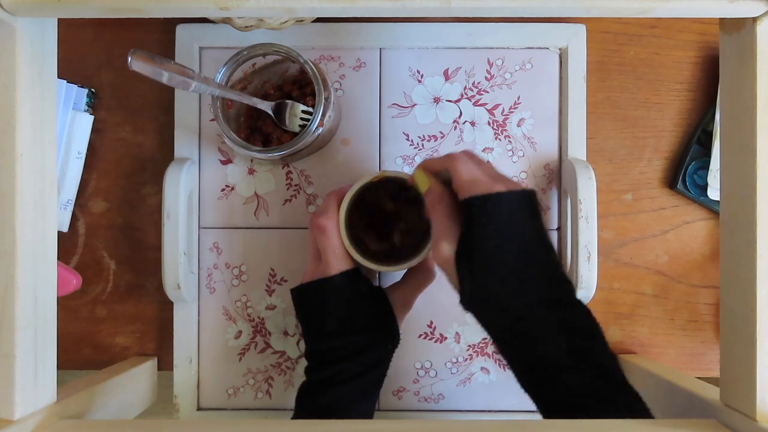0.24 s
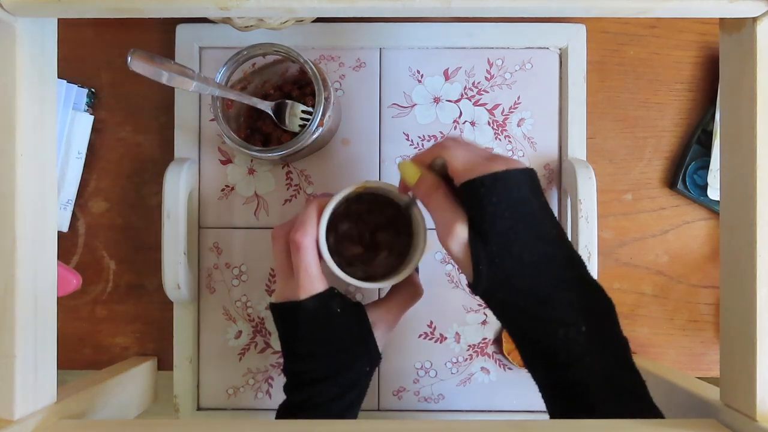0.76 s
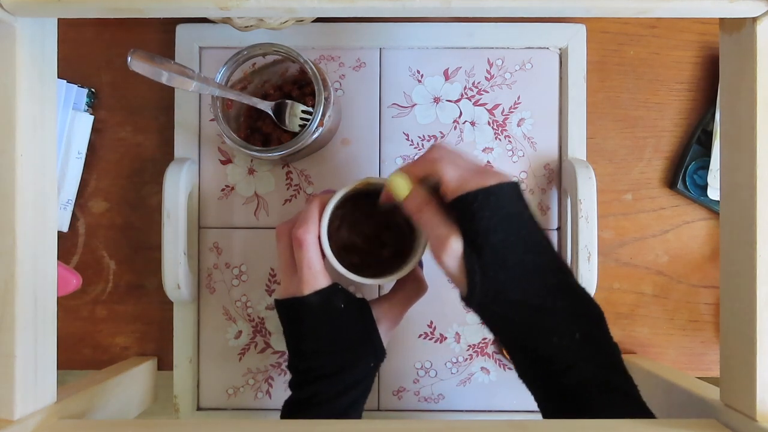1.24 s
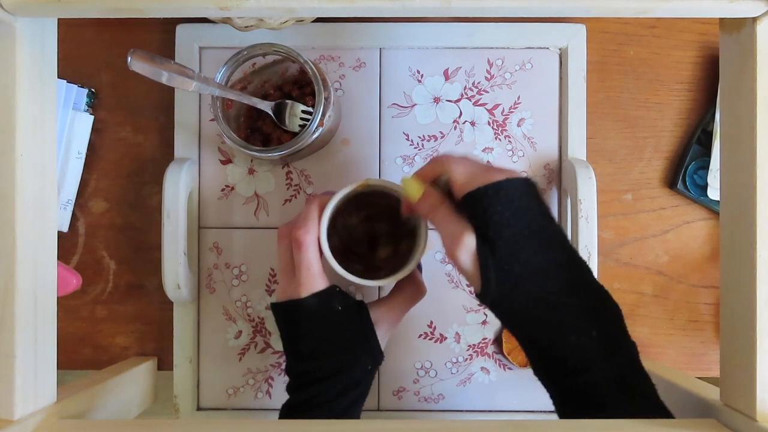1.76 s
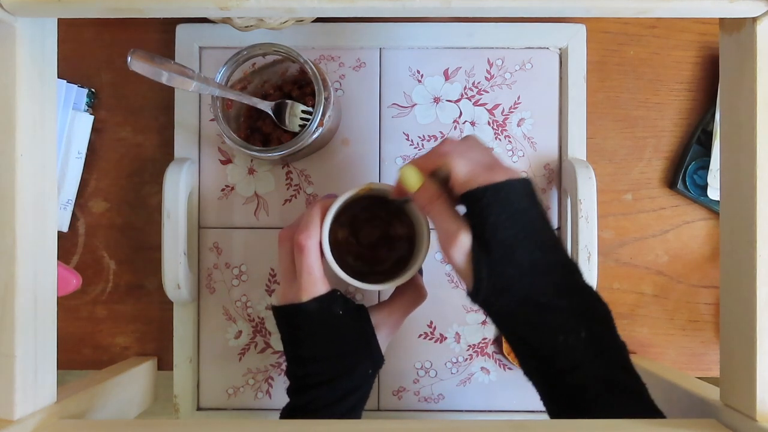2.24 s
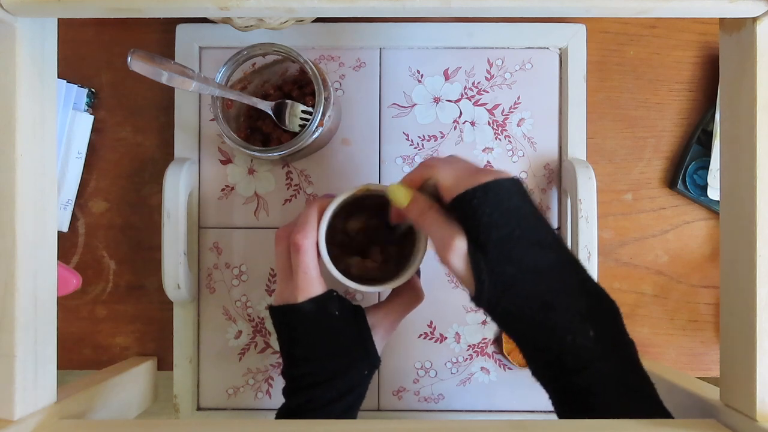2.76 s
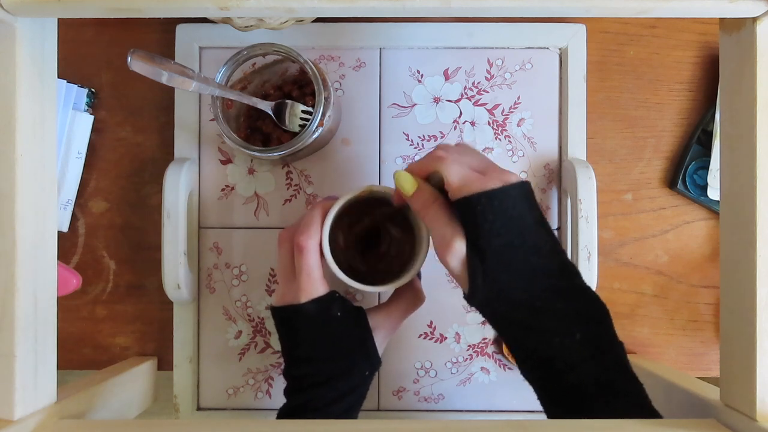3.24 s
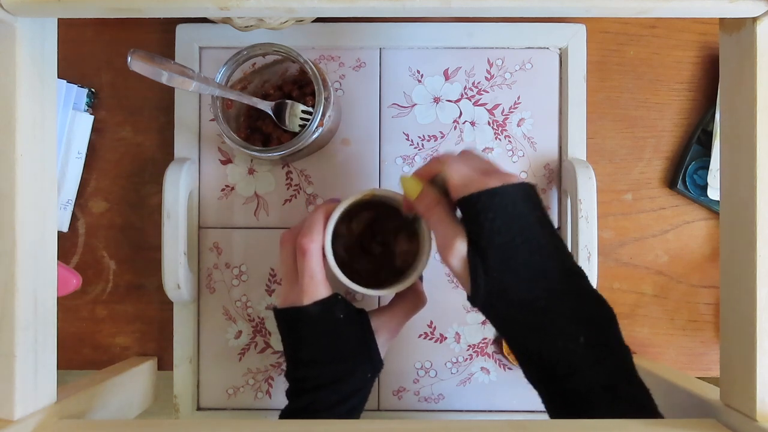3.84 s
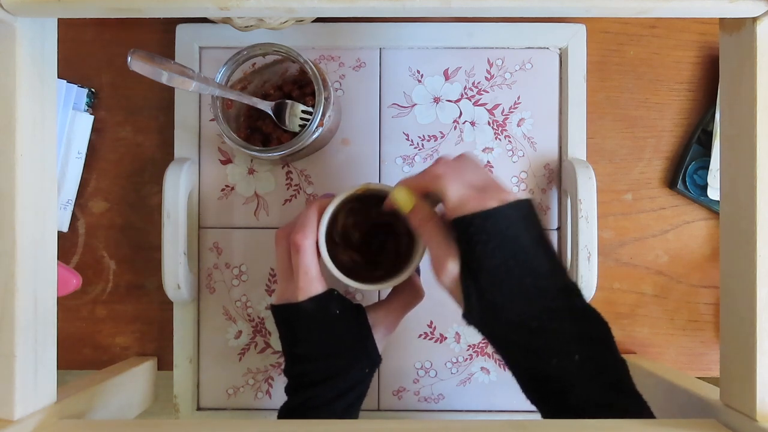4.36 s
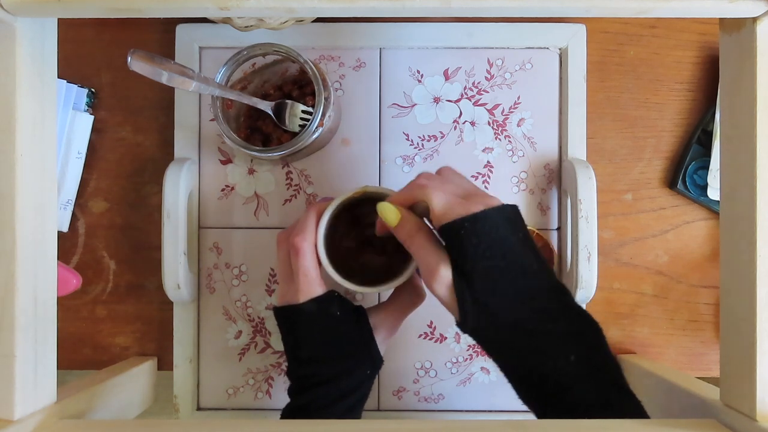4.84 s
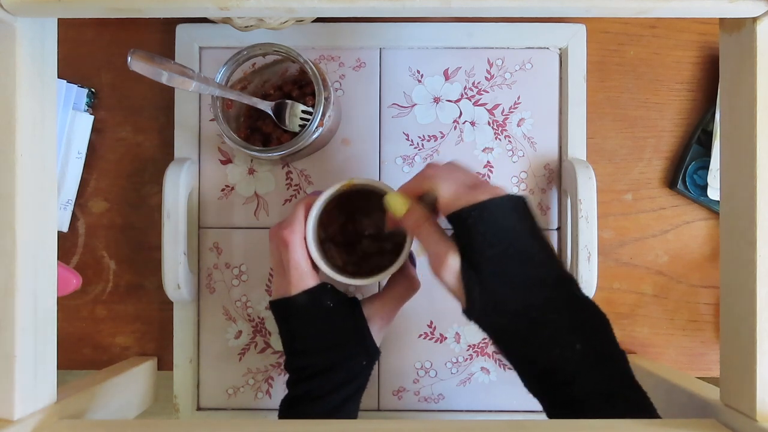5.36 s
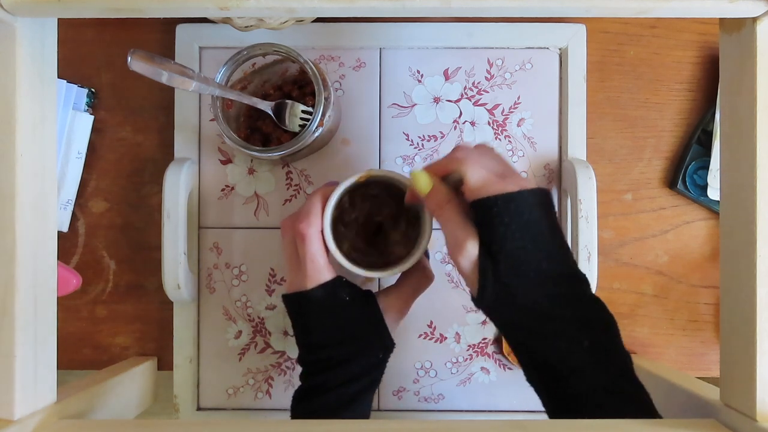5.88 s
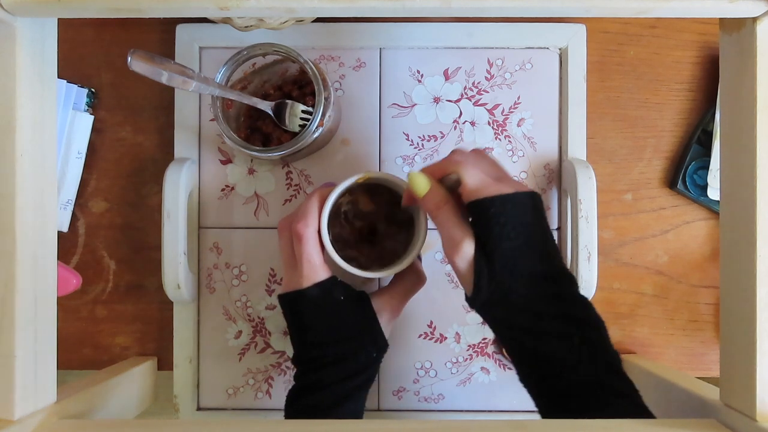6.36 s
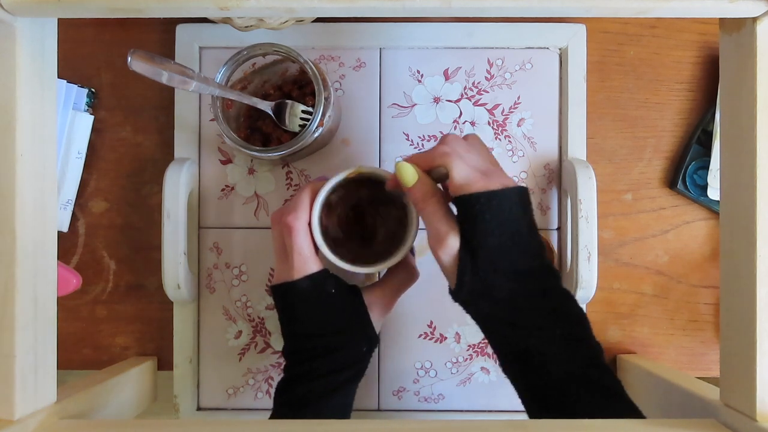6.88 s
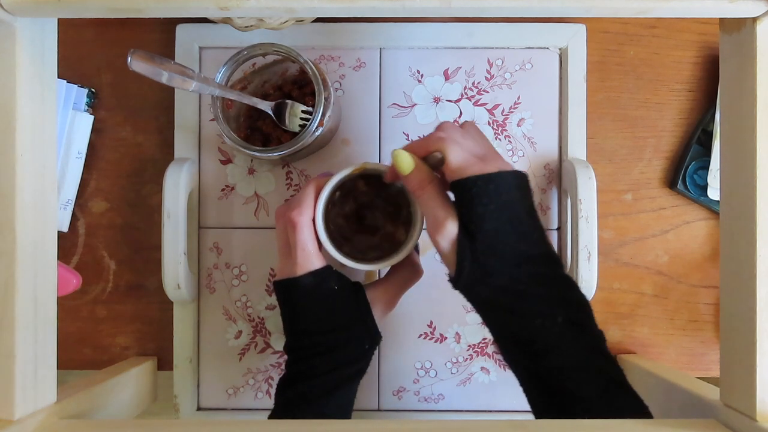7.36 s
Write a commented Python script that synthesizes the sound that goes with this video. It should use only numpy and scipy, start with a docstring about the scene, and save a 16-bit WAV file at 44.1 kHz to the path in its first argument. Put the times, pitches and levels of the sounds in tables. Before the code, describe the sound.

In a small, hard-walled kitchen, a metal spoon stirs a thick drink inside a hand-held ceramic cup, heard very close. From 0 to 0.7 s the cup base drags in short jerks over a resonant wooden tray, with a firm knock and clink at 0.33 s and a lighter knock at 0.5 s; then it is lifted. Stirring continues unevenly, with several short clinks per second, damped by hand and liquid, between soft taps and sharper hits around 1.9, 2.5, 3.0 and 4.0 s. A bright ping and light tray knock come near 3.35 s. Wet, patchy swishing is strongest around 4 to 5 s, with little rising plops throughout. A low tray thud falls at 6.15 s, a prominent hollow plop at 6.73 s, and clinks continue to the end at about 7.6 s. Short reflections, faint hiss and low refrigerator hum remain underneath.

```python
"""Spoon stirring a thick drink in a ceramic cup

A metal spoon stirs a hand-held cup above a wooden tray in a small hard-walled kitchen.
Clinks: damped wall modes plus noisy contact; pings and plops: short decaying sines; swish: patchy noise.
The cup drags and knocks on resonant tray modes. A two-sine refrigerator hum lies under a faint noise hiss.
"""
import sys
import numpy as np
from scipy import signal
from scipy.io import wavfile

SR = 44100
rng = np.random.default_rng(int(sys.argv[2]) if len(sys.argv) > 2 else 0)


def bounce(signal):
    """Save signal as a 16-bit WAV file at the path given by the first command-line argument."""
    frames = np.transpose(np.atleast_2d(signal))
    limited = np.clip(frames, -1, 1)
    pcm = np.round(limited * 32767).astype(np.int16)
    wavfile.write(sys.argv[1], SR, pcm)


N = 336042

# half-octave noise band edges, f/Hz
EDGES_HZ = 22 * 2 ** np.arange(0, 9.9, .5)

# refrigerator hum, turning rate and its double: level/dB
HUM_DB = [-44.5, -46]
# room hiss spectrum: f/Hz, density/dB per Hz
HISS_SPECTRUM = [(26, -25), (62, -20), (110, 3), (137, 2), (170, -4), (400, -6), (690, -15.5), (1000, -0.5),
                 (1800, -45), (2600, -61), (4750, -23.5), (7000, -35.5), (11000, -33.5), (15500, -57)]
# noise and echo width: f/Hz, side re mid/dB
SIDE_LEVEL = [(60, -32), (260, 0.5), (1400, -15.5), (3000, -16.5), (6000, -6), (10000, -0.5), (14000, 5)]
# kitchen reverberation: f/Hz, t60/s
KITCHEN = [(200, 0.25), (800, 0.25), (2000, 0.3), (5500, 0.29), (14000, 0.18)]
# spoon through the drink, brushing the wall: t/s, level/dB
SWISH = [(0, -54.5), (.6, -52), (.9, -48), (1.3, -49.5), (1.6, -49), (2.2, -51.5), (3.1, -48.5), (3.7, -50),
         (4.2, -47.5), (5, -46.5), (5.6, -51), (5.85, -50.5), (6.4, -48.5), (7.1, -49.5), (7.62, -52.5)]
# swish spectrum: f/Hz, density/dB per Hz
SWISH_SPECTRUM = [(290, -31), (500, 3.5), (911, -3.5), (1500, 5), (2630, -4.5), (2860, -16), (3190, -3),
                  (3420, -1.5), (14000, -33)]
# jerks of the cup base sliding on the tray: t/s, peak level/dB
SCUFFS = [(0.021, -32), (.19, -29.5), (.4, -31), (.6, -30.5), (0.664, -23)]
# cup or wrist on the tray: t/s, level/dB, tilt/dB per octave about 400 Hz
KNOCKS = [(0.329, -15, -2.5), (0.526, -25.5, -1), (3.383, -24.5, -0.5), (5.98, -43, 10), (6.014, -35.5, 13),
          (6.156, -12.5, -6), (6.255, -27.5, 6.5)]
# tray modes: f/Hz, level/dB, t60 when knocked/s
TRAY_MODES = [(156, -7, 0.018), (222.5, -18.5, 0.166), (237, -20.5, 0.11), (332, -5.5, 0.058),
              (384, -9.5, 0.063), (530, -4.5, 0.031), (709, -8, 0.07), (863, -5, 0.078), (1220, -11, 0.018),
              (1380, -9, 0.02)]
# air trapped behind the spoon plops: t/s, starting pitch f/Hz, level/dB
PLOPS = [(0.1395, 1105, -28.5), (0.3294, 1090, -19), (0.5234, 1150, -29), (0.8896, 1410, -32),
         (0.935, 1397, -15), (1.0494, 1725, -15.5), (1.0972, 1800, -35), (1.51, 1740, -44),
         (1.6044, 1695, -16.5), (1.722, 1736, -20.5), (1.9173, 1750, -41), (2.3339, 1420, -45),
         (2.7512, 1450, -31), (3.127, 1490, -25.5), (3.19, 1754, -19), (3.3444, 1700, -19),
         (3.388, 1250, -24.5), (3.54, 1500, -30), (3.5672, 1760, -15.5), (4.2054, 1063, -21),
         (4.4338, 1690, -29), (4.864, 1430, -27), (5.091, 1410, -26), (5.7939, 1890, -48),
         (5.851, 1410, -27.5), (6.0127, 1727, -25), (6.248, 1420, -27), (6.5033, 1700, -30.5),
         (6.5776, 1420, -18), (6.7309, 1738, -7.5), (6.7513, 1770, -11), (6.964, 1060, -31),
         (6.9885, 1700, -29), (7.0601, 1410, -22), (7.23, 1444, -20.5), (7.4776, 1286, -30.5)]
# spoon on cup: t/s, blow level/dB; re the blow: wall ring/dB, upper ring/dB, crack/dB
STRIKES = [(0.1402, -31.5, 1.5, -2.5, -28), (0.3294, -9, -5.5, -8.5, -23), (0.5249, -38.5, 2, -1.5, -24),
           (0.6444, -44, -10, -9, -25), (0.677, -33, -11, -15, -22), (0.8244, -21.5, -8.5, -3, -15.5),
           (0.8874, -20.5, -4.5, 5, -16.5), (0.936, -23, -20, -24, -23), (1.0987, -13, -9.5, -0.5, -23.5),
           (1.2341, -29.5, -7, 0, -11.5), (1.4466, -24.5, -10.5, -7, -10.5), (1.51, -22, 3.5, -8, -15),
           (1.6046, -23.5, -22, -27, -30), (1.723, -23.5, -5, -4.5, -23), (1.9164, -12, -4.5, 4, -16),
           (2.027, -30, -0.5, -18, -14), (2.1242, -14.5, -5.5, 2.5, -14.5), (2.268, -27.5, -7, -3, -10.5),
           (2.3346, -15, -6.5, 1, -18), (2.5285, -12, -6.5, 3.5, -12), (2.7508, -18.5, -11, -2, -21.5),
           (2.881, -34.5, 5.5, 3, -4), (2.9554, -10.5, -14, -0.5, -19.5), (3.0926, -31, -18, -2.5, -12),
           (3.1256, -41, 3, -18, -25), (3.19, -41, -3, -24, -17), (3.2234, -44, -25, -23, -10),
           (3.3432, -12.5, -4.5, -1, -15), (3.5417, -29.5, -12, -9, -19), (3.5677, -16.5, -10.5, -3, -23),
           (3.8716, -40.5, -4, -18, -23), (4.009, -11, -8.5, -4, -18), (4.2045, -19.5, 6, 2.5, -13.5),
           (4.4355, -22.5, 5, 3, -12), (4.6574, -29, -5.5, -4, -28), (4.7844, -21, -9, -15, -13),
           (4.8647, -19.5, 2.5, 3, -15), (5.0906, -16, -8, -2.5, -22), (5.232, -24.5, -12, -8, -23),
           (5.3208, -19, -9.5, -11, -22), (5.455, -26, -8.5, -3.5, -12.5), (5.74, -43, -18, -30, -42),
           (5.7932, -18, -11.5, -8.5, -31), (5.8467, -31.5, -13, -3, -46), (6.014, -12, -7, 0.5, -15.5),
           (6.249, -18, -8.5, 1.5, -20), (6.5057, -34.5, -12, -2, -41), (6.577, -21.5, -14, -29, -46),
           (6.7291, -13.5, -26, 1.5, -18), (6.7498, -24, 1, -3, -38), (6.9881, -27, -7, -4, -34),
           (7.0623, -26, -12, -34, -21), (7.23, -14, -13, -2, -18), (7.4775, -20.5, -16.5, -6.5, -33)]
# cup wall modes, damped by hand and drink: f/Hz, level/dB, t60 when struck/s
# the first two follow the wall ring, the rest the upper ring
CUP_MODES = [(1868.6, 6, 0.041), (1899.5, 7.5, 0.055), (4473, 1, 0.0074), (4543, -11, 0.007),
             (4671, -5.5, 0.032), (4783, -0.5, 0.016), (5100, -8, 0.0074), (5790, -30.5, 0.017),
             (9436, -25, 0.015)]
# noisy contact spectrum: f/Hz, density/dB per Hz
IMPACT_SPECTRUM = [(330, 16.5), (760, 29.5), (1450, 26.5), (2550, 8.5), (4000, 16), (5500, 18.5),
                   (7300, 18), (10600, 11), (15000, -5)]
# how far the contact follows the dull knock: f/Hz, share/0-1
KNOCK_SHARE = [(900, 1), (2600, 0)]
# how far the contact follows the crack: f/Hz, share/0-1
CRACK_SHARE = [(3800, 0), (7500, 1)]
# short notes of the spoon bowl after some blows: t/s, f/Hz, level/dB
PINGS = [(.3289, 3800, -19.5), (.8238, 3650, -20), (.936, 2800, -24), (1.0972, 3700, -20),
         (1.4461, 3450, -24.5), (1.722, 3800, -30), (2.1245, 2120, -14), (2.268, 3400, -26.5),
         (2.268, 5570, -24), (2.5276, 3300, -17.5), (2.8814, 3430, -29), (2.9553, 3840, -22),
         (3.0921, 3500, -28), (3.2234, 5780, -32.5), (3.3432, 3920, -9), (3.3432, 5190, -11),
         (3.5669, 3900, -24.5), (4.009, 2180, -26), (4.2034, 3930, -24), (4.4338, 2100, -30),
         (4.7864, 3210, -19.5), (4.8644, 4070, -30), (5.0903, 4370, -25), (5.3209, 3180, -30),
         (5.463, 3060, -20.5), (5.7934, 2300, -24), (5.8487, 3100, -27), (6.248, 4370, -31),
         (6.405, 5500, -39.5), (7.15, 5570, -41.5), (6.5762, 3060, -21.5), (6.5762, 5600, -34),
         (6.7299, 4220, -15.5), (6.9878, 2280, -30), (7.0621, 2960, -21.5), (7.231, 4000, -18)]

HUM_HZ, HISS_DB = 49.33, -52
SINGING_DB = -8  # cup wall re swish noise
WAKE_DB, WAKE_PEAK_S = -33.5, 0.033  # slosh re the blow, time to its peak
SCUFF_RISE_DB_PER_S, SCUFF_FALL_DB_PER_S, SLIDE_DB, LIFTED_S = 600, 182, -42.5, .688
TRAY_ROOM_DB, TRAY_SIDE_DB = -0.5, -13
KITCHEN_DB, FIRST_ECHO_S = 4.5, 0.00049
HIT_SAMPLES = 2600
BUBBLE_T60_S, BUBBLE_RISE, SPOON_T60_S = 0.026, 0.035, 0.013
CONTACT_S, CRACK_RISE_S = 0.00033, 0.0017  # the drink cushions the blow
IMPACT_T60_S, CLICK_DB, CHATTER_DB = 0.0063, 3, 2
KNOCK_DB, KNOCK_FOLLOWS = -17, 0.35  # dull knock re the blow, dB per dB of wall ring
CUTOFF_HZ = 16500


def from_db(db):
    """Decibels to gain."""
    return 10 ** (np.asarray(db) / 20)


def rms_one(x):
    """Scaled to rms 1."""
    return x / np.sqrt(np.mean(x ** 2) + 1e-20)


def in_time(rows):
    """Gain of a (t/s, level/dB) curve at every sample, -120 dB past its end."""
    t_s, level_db = np.transpose(rows)
    return from_db(np.interp(np.arange(N) / SR, t_s, level_db, right=-120))


def at_hz(points, hz):
    """Frequency table read on a log-frequency axis."""
    table_hz, value = np.transpose(points)
    return np.interp(np.log(hz), np.log(table_hz), value)


def swelling(t_s, rise_s):
    """Soft onset of a cushioned contact."""
    return 1 - np.exp(-t_s / rise_s)


def bands(shape, first=0, envelope=1, click=0):
    """Centre/Hz and white noise of each half-octave band, led by a click; neighbours are unrelated."""
    white = rng.standard_normal((2, *shape)) * envelope
    white[0, ..., 0], white[1, ..., 0] = click, -click
    for k in range(first, len(EDGES_HZ) - 1):
        low_hz, high_hz = EDGES_HZ[k:k + 2]
        sos = signal.butter(2, [low_hz, high_hz], "band", fs=SR, output="sos")
        yield np.sqrt(low_hz * high_hz), signal.sosfilt(sos, white[k % 2])


def mid_side(spectrum, first=0, patchy_db=0):
    """Coloured noise, mid rms 1; patchy_db lets each band's level wander on its own about every 50 ms."""
    steps = np.arange(N) / (SR // 20)
    count = N // 2000 + 2
    out = 0
    for hz, band in bands((2, N), first):
        patches_db = patchy_db * np.interp(steps, np.arange(count), rng.standard_normal(count))
        width_db = np.array([[0], [at_hz(SIDE_LEVEL, hz)]])
        out = out + from_db(at_hz(spectrum, hz) + patches_db + width_db) * band
    return out / np.sqrt(np.mean(out[0] ** 2))


def resonate(x, hz, t60_s):
    """Two-pole resonator: a unit click sets a sine of initial height 1 ringing."""
    radius, w = from_db(-60 / (t60_s * SR)), 2 * np.pi * hz / SR
    return signal.lfilter([0, np.sin(w)], [1, -2 * radius * np.cos(w), radius * radius], x + 1e-18)


def struck(modes, levels_db, spread_db, detune):
    """Decaying sines, one row per blow (levels_db: blows x modes); grip and drink shift each mode."""
    t_s = np.arange(HIT_SAMPLES) / SR
    hz, mode_db, t60_s = np.transpose(modes)
    chance = rng.standard_normal((*levels_db.shape, 2))
    signs = (-1) ** np.arange(len(hz))
    gains = from_db(levels_db + mode_db + spread_db * chance[..., 0]) * signs
    pitch_hz = hz * (1 + detune * chance[..., 1])
    decays = from_db(-60 * t_s / t60_s[:, None])
    sines = np.sin(2 * np.pi * pitch_hz[..., None] * t_s)
    return np.einsum("bm,mt,bmt->bt", gains, decays, sines)


def echo_tails():
    """Six diffuse mid/side tails, each band dying at its own rate; mean mid energy 1."""
    t_s = np.arange(15000) / SR
    tails = 0
    for hz, band in bands((6, 2, len(t_s)), first=4):
        width_db = np.array([[0], [at_hz(SIDE_LEVEL, hz)]])
        tails = tails + from_db(-60 * t_s / at_hz(KITCHEN, hz) + width_db) * band
    tails *= np.clip(t_s / FIRST_ECHO_S, 0, 1) ** 2
    return tails / np.sqrt(np.mean(np.sum(tails[:, 0] ** 2, axis=1)))


def in_kitchen(times_s, hits, wet_db):
    """Each hit direct in mid plus one of the tails in turn, as the cup keeps moving."""
    responses = from_db(wet_db) * echo_tails()
    responses[:, 0, 0] = 1  # direct sound
    choice = np.arange(len(hits)) % len(responses)
    heard = signal.fftconvolve(hits[:, None], responses[choice], axes=2)
    out = np.zeros((2, N + SR))
    for t_s, sound in zip(times_s, heard):
        start = round(t_s * SR)
        out[:, start:start + sound.shape[1]] += sound
    return out[:, :N]


def notes(rows, t60_s, rise):
    """Short decaying sines; pitch climbs by a fraction 2 * rise per t60."""
    start_s, hz, level_db = np.transpose(rows)[:, :, None]
    t_s = np.arange(HIT_SAMPLES) / SR
    sines = np.sin(2 * np.pi * hz * t_s * (1 + rise * t_s / t60_s))
    tones = from_db(level_db - 60 * t_s / t60_s) * sines
    return in_kitchen(start_s[:, 0], swelling(t_s, CONTACT_S) * tones, KITCHEN_DB)


def refrigerator():
    """Compressor motor's turning rate and its double, mid only."""
    turn = 2 * np.pi * HUM_HZ * np.arange(N) / SR
    hum = sum(np.sqrt(2) * from_db(db) * np.cos(k * turn) for k, db in enumerate(HUM_DB, 1))
    return hum * [[1], [0]]


def hiss():
    """Steady coloured room noise."""
    return from_db(HISS_DB) * mid_side(HISS_SPECTRUM)


def wake():
    """Gain of the slosh that swells and ebbs after each blow."""
    t_s = np.arange(N) / SR
    gain = 0
    for start_s, blow_db, *_ in STRIKES:
        age = np.clip(t_s - start_s, 0, None) / WAKE_PEAK_S
        gain = gain + from_db(WAKE_DB + blow_db) * age * np.exp(1 - age)
    return gain


def swish():
    """Wet patchy noise; the same friction keeps the cup wall faintly singing."""
    rub = rng.standard_normal((2, N)) * from_db([[0], [-15]])
    # modes die faster than when struck
    singing = rms_one(sum(from_db(db) * resonate(rub, hz, 0.23 * t60_s) for hz, db, t60_s in CUP_MODES))
    wet = mid_side(SWISH_SPECTRUM, first=7, patchy_db=4.5)
    return (in_time(SWISH) + wake()) * (wet + from_db(SINGING_DB) * singing)


def sliding():
    """Drag gain: jerks rise fast and fade into a faint slide, until the cup is lifted."""
    t_s = np.arange(N) / SR
    jerks_db = [db - np.where(t_s < s, SCUFF_RISE_DB_PER_S * (s - t_s), SCUFF_FALL_DB_PER_S * (t_s - s))
                for s, db in SCUFFS]
    lift = np.clip((LIFTED_S - t_s) / 0.0084, 0, 1)
    return from_db(np.maximum(np.max(jerks_db, axis=0), SLIDE_DB)) * lift


def tray_drag():
    """The dragged base feeds uneven noise grains to the tray modes."""
    noise = rng.standard_normal((2, N))
    grain_db = 2.0 * rng.standard_normal(N // 300 + 1)
    grains = noise * from_db(grain_db).repeat(300)[:N]
    # modes die faster than when knocked
    drag = sum(from_db(db) * resonate(grains, hz, 0.39 * t60_s) for hz, db, t60_s in TRAY_MODES)
    return sliding() * rms_one(drag) * from_db([[0], [-15]])


def tray_knocks():
    """Knocks strike the wooden modes, with a tilt in level across them."""
    start_s, level_db, tilt_db = np.transpose(KNOCKS)[:, :, None]
    octaves = np.log2(np.array(TRAY_MODES)[:, 0] / 400)
    hits = struck(TRAY_MODES, level_db + tilt_db * octaves, spread_db=-1.5, detune=0.0014)
    return in_kitchen(start_s[:, 0], hits, TRAY_ROOM_DB) * from_db([[0], [TRAY_SIDE_DB]])


def tray():
    """Knocks and drag, bass cut."""
    sos = signal.butter(4, 125, "high", fs=SR, output="sos")
    return signal.sosfilt(sos, tray_knocks() + tray_drag())


def plops():
    """Trapped air bubbles: sines rising a little as they die."""
    return notes(PLOPS, BUBBLE_T60_S, BUBBLE_RISE)


def clinks():
    """Blows ring the wall modes and add a noisy contact: a click, then chatter."""
    start_s, blow_db, ring_db, upper_db, crack_db = np.transpose(STRIKES)[:, :, None]
    t_s = np.arange(HIT_SAMPLES) / SR
    mode_levels_db = np.where(np.arange(len(CUP_MODES)) < 2, ring_db, upper_db)
    wall = struck(CUP_MODES, mode_levels_db, spread_db=2.05, detune=0.0026)
    chatter = from_db(CHATTER_DB - 60 * t_s / IMPACT_T60_S) * swelling(t_s, CRACK_RISE_S)
    knock_db = KNOCK_DB + KNOCK_FOLLOWS * ring_db
    contact = 0
    for hz, band in bands((len(STRIKES), len(t_s)), 7, chatter, from_db(CLICK_DB)):
        # bass follows the dull knock, treble the crack
        follow_db = at_hz(KNOCK_SHARE, hz) * knock_db + at_hz(CRACK_SHARE, hz) * crack_db
        contact = contact + from_db(at_hz(IMPACT_SPECTRUM, hz) + follow_db) * band
    hits = from_db(blow_db) * (swelling(t_s, CONTACT_S) * wall + contact)
    return in_kitchen(start_s[:, 0], hits, KITCHEN_DB)


def pings():
    """Spoon bowl: short sines of fixed pitch."""
    return notes(PINGS, SPOON_T60_S, 0)


def scene():
    """Sum in mid and side, then left and right."""
    spoon = clinks() + pings() + plops() + swish()
    mid, side = spoon + tray() + refrigerator() + hiss()
    return np.array([mid + side, mid - side])


def record(dry):
    """Peaks are rounded, the top is cut."""
    rounded = 1.165 * np.tanh(dry / 1.223)
    return signal.sosfilt(signal.cheby2(12, 70, CUTOFF_HZ, fs=SR, output="sos"), rounded)


dry = scene()
out = record(dry)
bounce(out)
```